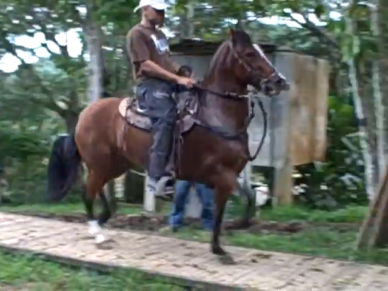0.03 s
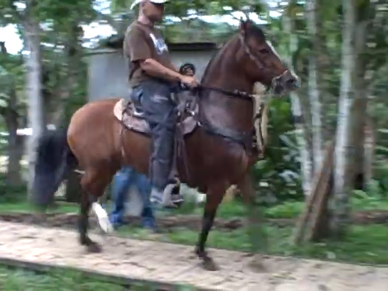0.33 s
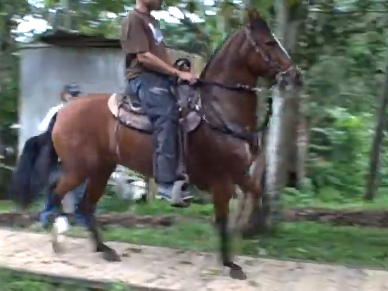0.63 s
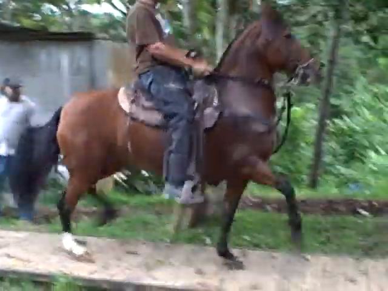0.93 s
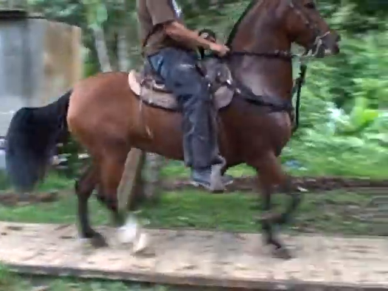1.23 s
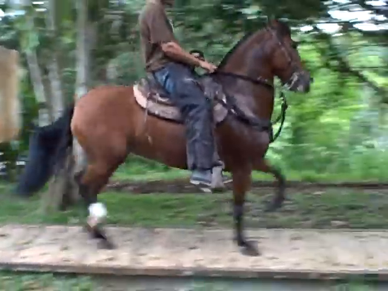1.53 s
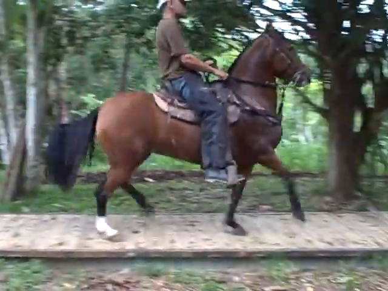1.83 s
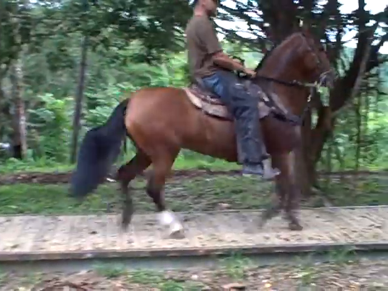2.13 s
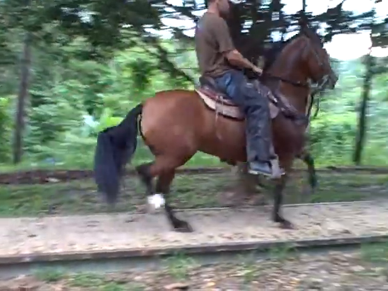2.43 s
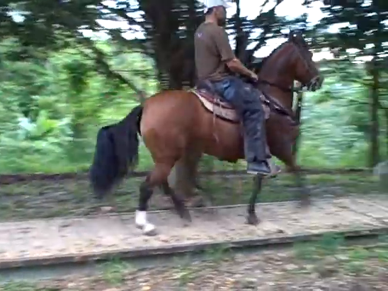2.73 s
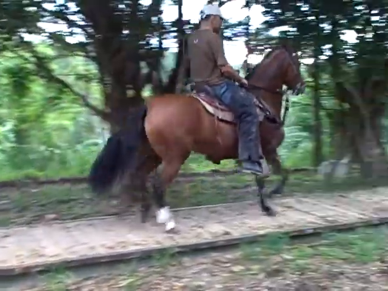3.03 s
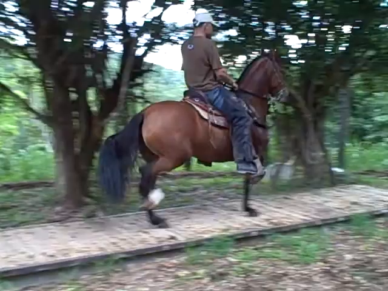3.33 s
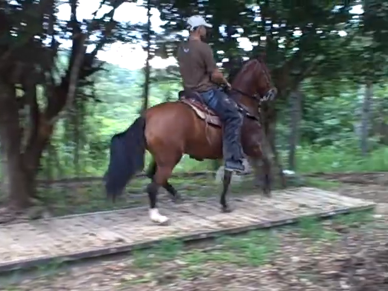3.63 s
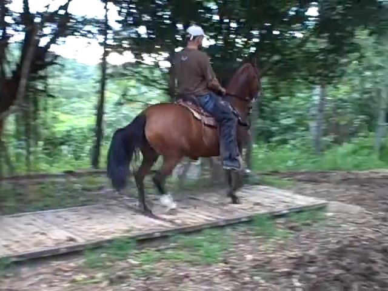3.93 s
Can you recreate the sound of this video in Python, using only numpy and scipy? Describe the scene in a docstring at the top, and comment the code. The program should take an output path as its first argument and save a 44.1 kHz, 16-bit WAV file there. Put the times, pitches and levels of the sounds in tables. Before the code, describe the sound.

Horse hooves knock in a steady trot on a hollow wooden walkway outdoors.

```python
"""Horse trotting on a plank walkway.

Diagonal pairs of hooves land a little apart on raised boards among trees. Each contact cracks on the
wood, makes hoof and plank knock and sets the deck booming; the loudest overload the microphone.
The tack clinks between steps. Thin insect song hangs over a faint outdoor hush."""
import sys
import numpy as np
from scipy import signal
from scipy.io import wavfile

SR = 44100
rng = np.random.default_rng(int(sys.argv[2]) if len(sys.argv) > 2 else 0)


def transcribe(signal):
    """Save signal, clipped to [-1, 1], as a 16-bit WAV file at the path in sys.argv[1]."""
    frames = np.atleast_2d(signal).T
    limited = np.clip(frames, -1, 1)
    pcm = np.round(limited * 32767).astype(np.int16)
    wavfile.write(sys.argv[1], SR, pcm)


N = 176400

# toe, heel and board contacts:
# start_s, clack_db, deck_db, plank_db, knock_db, crack_db, pitch_ratio, knock_hz
CONTACTS = [ (.016,-38,-19,-20,-26,-39,1.02,645), (0.0252,-18.5,-16.5,-19.5,-20,-24.5,0.98,670),
            (.055,-22,-7.5,-14.5,-19,-37,0.93,550), (0.2439,-24,-10,-12,-11.5,-27,0.89,645),
            (0.2524,-19.5,-25,-20,-16,-23,0.91,703), (.264,-22,-15.5,-16.5,-24,-26,1,812),
            (.423,-23.5,-9,-14,-13.5,-35,0.91,594), (0.4293,-9.5,-14.5,-31,-12.5,-25.5,0.93,679),
            (.467,-24,-11.5,-9,-19,-28,0.95,543), (.493,-25,-13.5,-19,-19.5,-41,1.04,712),
            (.664,-22.5,-21,-13,-16.5,-36,0.81,700), (.670,-25,-11.5,-19,-14,-24.5,1.18,667),
            (.680,-14,-20.5,-19,-13.5,-25.5,1,580), (.865,-18.5,-16,-24,-16.5,-34,1,657),
            (0.8739,-16.5,-20.5,-11,-21.5,-27,1.094,690), (.890,-19,-10,-12,-10,-26.5,0.98,634),
            (0.8947,-21.5,-19,-29,-18,-28.5,0.89,640), (1.092,-37,-15,-23,-25.5,-31,0.83,593),
            (1.105,-15,-8,-8.5,-11.5,-17.5,0.96,571), (1.110,-21.5,-8,-13,-14,-40,1.07,620),
            (1.273,-32,-28,-21.5,-20,-36,1.1,740), (1.286,-7,-19,-21,-11.5,-21.5,1.15,734),
            (1.313,-27,-12.5,-22,-20,-33,1.1,670), (1.319,-19,-17,-15,-13.5,-28.5,.97,673),
            (1.529,-25.5,-22,-15.5,-23.5,-28,1.19,640), (1.539,-21,-13,-11.5,-22,-22.5,1.03,750),
            (1.548,-20,-15.5,-13,-14.5,-27.5,.98,726), (1.574,-17,-15,-18.5,-17.5,-41,1.13,805),
            (1.754,-26.5,-10.5,-5,-22.5,-27.5,0.99,532), (1.770,-15.5,-18,-13,-13.5,-29,1.09,765),
            (1.7777,-19,-12,-13,-14,-20.5,.96,766), (1.956,-24,-10,-20,-26,-39,0.85,633),
            (1.965,-12.5,-11,-12.5,-15,-16,1.01,657), (1.970,-17,-22,-16,-11.5,-36,0.98,762),
            (2.199,-26,-10.5,-11.5,-15,-27,.99,758), (2.207,-18.5,-10,-4.5,-23.5,-32,0.99,724),
            (2.227,-24.5,-12.5,-18.5,-18,-29.5,0.93,784), (2.419,-19,-30,-16.5,-17.5,-30,0.98,600),
            (2.4499,-30,-14.5,-12.5,-21.5,-28,.95,628), (2.608,-40,-12.5,-20.5,-15,-38.5,0.994,710),
            (2.6185,-31,-15.5,-18.5,-15.5,-27.5,0.89,700), (2.651,-32,-12.5,-5.5,-39,-37,0.99,700),
            (2.835,-26.5,-6,-14.5,-21,-28,0.99,800), (2.852,-20.5,-16,-16,-26,-33,0.92,720),
            (2.863,-18.5,-11,-16.5,-20.5,-27,1.1,707), (3.071,-12,-34,-15,-20.5,-26.5,.99,624),
            (3.079,-41,-9,-9,-22.5,-33,0.95,642), (3.2872,-33,-16,-20,-26,-31.5,0.75,794),
            (3.296,-30,-13,-20.5,-20,-46,1.02,770), (3.313,-28,-34,-26,-29,-40,1.05,590),
            (3.3214,-19.5,-19.5,-21,-19,-41,0.98,594), (3.561,-24,-20,-26,-26,-45,0.86,636),
            (3.571,-17,-12.5,-20.5,-20,-36,.98,735), (3.581,-24,-41,-16.5,-22.5,-38,0.97,683),
            (3.777,-14,-11.5,-14,-9,-29,0.99,679), (3.788,-27,-26,-24,-23,-35,1.08,686),
            (3.799,-19.5,-15,-30,-34,-32.5,0.98,513), (3.983,-20,-20,-20.5,-24,-41,1.11,638),
            (3.993,-25,-19,-35,-34,-29.5,0.88,640)]
# weight moving to the next pair of hooves: start_s, thud_db
WEIGHT_SHIFTS = [(.218,-10), (.641,-8), (1.08,-11.5), (1.251,-9.5), (1.513,-9), (1.74,-10), (2.19,-12),
                 (2.392,-12.5), (2.814,-12), (3.064,-8), (3.74,-12)]
# bit and buckle clinks: start_s, level_db
TACK_CLINKS = [(0.3276,-28), (0.3533,-29.5), (.7332,-33.5), (0.7923,-32), (1.3646,-30.5), (1.8438,-29),
               (2.0347,-34), (2.0727,-37), (2.493,-33), (2.517,-33), (2.546,-32.5), (2.9274,-28.5),
               (2.997,-32.5), (3.404,-41), (3.462,-32.5)]
# modes of wood and hoof: pitch_hz, level_db, t60_s
DECK_MODES = [(60.6, -5.5, 0.29), (81.3, 2, 0.11), (115, 0, 0.097)]
PLANK_MODES = [(138, -11, 0.063), (193.75, 2.5, 0.16), (233.5, -12.5, 0.15), (280, -13, 0.12)]
CLACK_MODES = [(1220, -5, 0.041), (1166, -4.5, 0.035), (1444, -12, 0.01), (1938, -17, 0.037),
               (2550, -7, 0.013)]
CRACK_MODES = [(2370, 0.5, 0.0028), (4070, 1, 0.0034), (5100, -4, 0.0037)]
# modes of the hollow knock and the tack: pitch_ratio, level_db, t60_s
KNOCK_MODES = [(.87, -9, 0.017), (1, 0.5, 0.056), (1.13, -9.5, 0.047)]
METAL_MODES = [(.55, -5, 0.017), (1, 8.5, 0.019), (1.06, -2.5, 0.0095)]
# dense board ring and its echo from the trees: freq_hz, ring_db, ring_t60_s, echo_db
BOARD_SPECTRUM = [(45.4, -16.5, 0.28, -9.5), (97, -12.5, 0.29, -19), (190, -13, 0.16, -21),
                  (280, -8.5, 0.1, -26), (427, -16, 0.083, -32), (690, -9.5, 0.13, -28.5),
                  (877, -16, 0.07, -30.5), (1230, -8, 0.037, -34), (2070, -16.5, 0.071, -33.5),
                  (4000, -13.5, 0.063, -26.5), (6770, -24.5, 0.04, -35), (13200, -30, 0.058, -46)]
# insect trills: pitch_hz, level_db
TRILLS = [(11800, -75.5), (12250, -75), (13260, -65.5), (13950, -65.5)]
# far insect buzzes: start_s, length_s, pitch_hz, level_db
FAR_BUZZES = [(2.5,1.05,9000,-70.5), (3.5,0.58,7900,-73)]
# outdoor hush: freq_hz, band_db
HUSH_SPECTRUM = [(25, -40), (55, -34.5), (110, -59), (200, -57), (400, -73.5), (700, -60.5), (1500, -67.5),
                 (4000, -70.5), (8000, -70.5), (10500, -71), (14000, -68)]

EDGES_HZ = np.geomspace(22, 17000, 20)
CENTRES_HZ = np.sqrt(EDGES_HZ[1:] * EDGES_HZ[:-1])


def hooves():
    """Each contact rings the modes of deck, plank and hoof, with a brief noise snap on top."""
    start_s, clack_db, deck_db, plank_db, knock_db, crack_db, pitch_ratio, knock_hz = np.transpose(CONTACTS)
    hardness_db = crack_db - crack_db.mean()
    rise_s = 0.0005 * from_db(-0.6 * hardness_db)   # weak contacts rise slower
    deck = strike(DECK_MODES, start_s, deck_db + 2, pitch_ratio, vary_db=0.5)
    plank = strike(PLANK_MODES, start_s, plank_db + 1, pitch_ratio, vary_db=0.5)
    knock = strike(KNOCK_MODES, start_s, knock_db - 3, knock_hz, vary_db=1, rise_s=rise_s)
    clack = strike(CLACK_MODES, start_s, clack_db - 3, pitch_ratio, vary_db=1, rise_s=rise_s)
    crack = strike(CRACK_MODES, start_s, crack_db - 3.5, pitch_ratio, vary_db=2.5)
    snap_db = crack_db - 6 + 0.067 * hardness_db   # hard blows are sharper
    snap = decay(start_s, snap_db, t60_s=0.0033) * noise([1200, 11300], "band")
    return soften(deck, push_s=0.0038) + soften(plank, push_s=0.003) + knock + clack - crack + snap


def boards():
    """Crowded modes of loose boards swell and die band by band; the trees return a faint echo."""
    start_s, clack_db, deck_db, plank_db, knock_db, crack_db, _, _ = np.transpose(CONTACTS)
    parts_db = np.transpose([deck_db, plank_db, knock_db, clack_db, crack_db])
    parts_hz = [75, 200, 650, 1400, 4000]
    out = np.zeros(N)
    for low_hz, high_hz, centre_hz in zip(EDGES_HZ, EDGES_HZ[1:], CENTRES_HZ):
        ring_db, ring_t60_s, echo_db = spectrum_at(BOARD_SPECTRUM, centre_hz)
        blow_db = np.array([np.interp(np.log(centre_hz), np.log(parts_hz), row) for row in parts_db])
        drive_db = blow_db.mean() + 0.87 * (blow_db - blow_db.mean())   # light contacts rattle too
        ring = soften(decay(start_s, drive_db + ring_db, ring_t60_s), push_s=0.0012)
        echo = soften(decay(start_s, drive_db + echo_db, t60_s=0.37), push_s=0.016)
        out += np.hypot(ring, echo) * noise([low_hz, high_hz], "band")
    return out


def weight_shifts():
    """Deck and plank thud softly under the shifting weight while a hoof scuffs."""
    start_s, thud_db = np.transpose(WEIGHT_SHIFTS)
    thuds = strike(DECK_MODES + PLANK_MODES, start_s, thud_db - 5, np.ones(len(start_s)), vary_db=1.2)
    scuffs = decay(start_s, level_db=-51, t60_s=0.16) * noise([490, 2210], "band")
    return soften(thuds, push_s=0.0061) + scuffs


def grit(grains_per_s=91):
    """Dirt and dry leaves crunch under each planted hoof."""
    start_s, *_, crack_db, _, _ = np.transpose(CONTACTS)
    grains = (rng.random(N) < grains_per_s / SR) * rng.standard_normal(N)
    return decay(start_s, crack_db - 28.5, t60_s=0.22) * unit_rms(butter(grains, 2980, "high"))


def tack():
    """Two small metal parts touch, ring at new pitches each time and jingle briefly."""
    start_s, level_db = np.transpose(TACK_CLINKS)
    rings = np.zeros(N)
    for part_hz in (8240, 12300):
        pitch_hz = part_hz * (1 + 0.038 * rng.standard_normal(len(start_s)))
        rings += strike(METAL_MODES, start_s, level_db - 18, pitch_hz, vary_db=3)
    jingle = decay(start_s, level_db - 14, t60_s=0.062) * noise(6500, "high")
    return rings + jingle


def insect_trills(width_hz=170, flutter_db=3, chirp_db=8):
    """Thin fluttering trills swell into short, irregular chirps."""
    out = np.zeros(N)
    for pitch_hz, level_db in TRILLS:
        chirps = np.tanh(2 * (noise(3.5, "low") - 0.5))   # offset keeps chirps sparse
        trill = noise([pitch_hz - width_hz / 2, pitch_hz + width_hz / 2], "band")
        swell_db = flutter_db * noise(25, "low") + chirp_db * chirps
        out += from_db(level_db) * unit_rms(trill * from_db(swell_db))
    return out


def far_insects(width_hz=870, fade_s=0.098):
    """Far insects make a steady high shimmer and buzzes that fade in and out."""
    t = np.arange(N) / SR
    out = from_db(-76.5) * noise([11100, 14600], "band")
    for start_s, length_s, pitch_hz, level_db in FAR_BUZZES:
        gate = np.clip(np.minimum(t - start_s, start_s + length_s - t) / fade_s, 0, 1)
        buzz = noise([pitch_hz - width_hz / 2, pitch_hz + width_hz / 2], "band")
        out += from_db(level_db) * gate * buzz
    return out


def hush():
    """Steady outdoor noise, strongest in the bass."""
    band_gains = from_db(spectrum_at(HUSH_SPECTRUM, CENTRES_HZ)[0])
    return sum(gain * noise([low_hz, high_hz], "band")
               for gain, low_hz, high_hz in zip(band_gains, EDGES_HZ, EDGES_HZ[1:]))


def strike(modes, start_s, level_db, pitch_scale, vary_db, rise_s=1e-6):
    """Each blow rings all modes as damped sines of slightly random strength."""
    mode_pitch, mode_db, t60_s = np.transpose(modes)[:, :, None]
    t = np.arange(int(t60_s.max() * SR)) / SR
    fades = from_db(mode_db - 60 * t / t60_s)
    rise_s = np.broadcast_to(rise_s, len(start_s))
    scatter_db = vary_db * rng.standard_normal((len(start_s), len(modes), 1))
    out = np.zeros(N)
    for i, onset in enumerate(to_samples(start_s)):
        sines = np.sin(2 * np.pi * mode_pitch * pitch_scale[i] * t)
        ring = (from_db(level_db[i] + scatter_db[i]) * fades * sines).sum(0)
        attack = 1 - np.exp(-t / rise_s[i])
        out[onset:onset + len(t)] += (attack * ring)[:N - onset]
    return out


def decay(start_s, level_db, t60_s):
    """Envelope that jumps at each event and dies away; overlaps add in power."""
    power = np.zeros(N)
    np.add.at(power, to_samples(start_s), from_db(level_db) ** 2)
    pole = from_db(-60 / (t60_s * SR)) ** 2
    return np.sqrt(signal.lfilter([1], [1, -pole], power + 1e-18))


def soften(x, push_s):
    """Spread a blow over a half-sine push."""
    push = np.sin(np.pi * np.minimum(np.arange(1, SR // 50) / (push_s * SR), 1))
    return signal.lfilter(push / push.sum(), [1], x)


def noise(cutoff_hz, kind):
    """Settled filtered noise, rms 1."""
    return unit_rms(butter(rng.standard_normal(N + SR // 4), cutoff_hz, kind)[-N:])


def butter(x, cutoff_hz, kind):
    """Second-order Butterworth filter."""
    return signal.sosfilt(signal.butter(2, cutoff_hz, kind, fs=SR, output="sos"), x)


def spectrum_at(spectrum, freq_hz):
    """Interpolate each column over log frequency."""
    points_hz, *columns = np.transpose(spectrum)
    return [np.interp(np.log(freq_hz), np.log(points_hz), column) for column in columns]


def to_samples(time_s):
    return np.clip(time_s * SR, 0, N - 1).astype(int)


def unit_rms(x):
    return x / np.sqrt(np.mean(x ** 2) + 1e-20)


def from_db(db):
    return 10 ** (np.asarray(db) / 20)


def scene():
    """Horse, walkway and woods in mono."""
    horse = hooves() + boards() + weight_shifts() + grit() + tack()
    woods = insect_trills() + far_insects() + hush()
    return (horse + woods)[None]


def record(dry, low_cut_hz=42, ceiling=0.71, stopband_hz=16900):
    """The microphone drops the deepest bass, flattens the peaks and cuts the top."""
    drive = butter(butter(dry, low_cut_hz, "high"), low_cut_hz, "high") / ceiling
    clipped = ceiling * drive / (1 + drive ** 16) ** (1 / 16)
    return signal.sosfilt(signal.cheby2(12, 70, stopband_hz, fs=SR, output="sos"), clipped)


dry = scene()
out = record(dry)
transcribe(out)
```